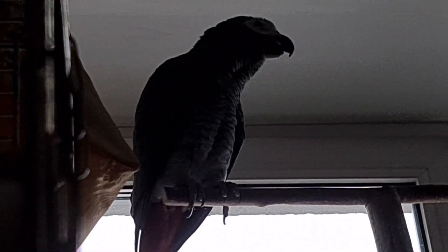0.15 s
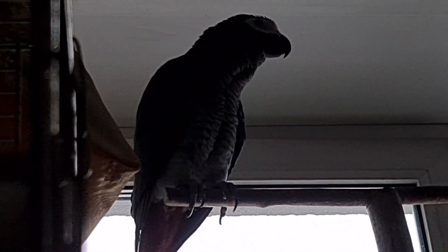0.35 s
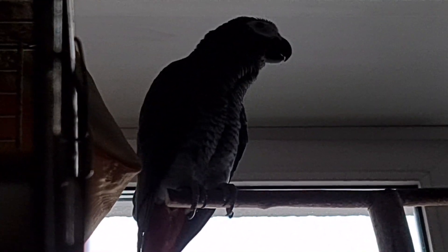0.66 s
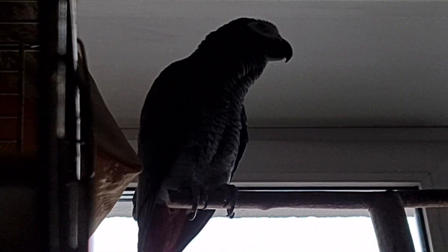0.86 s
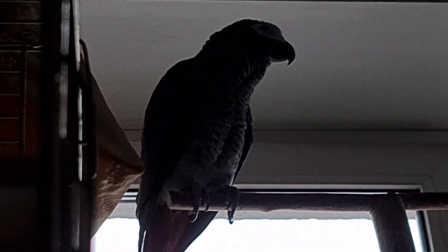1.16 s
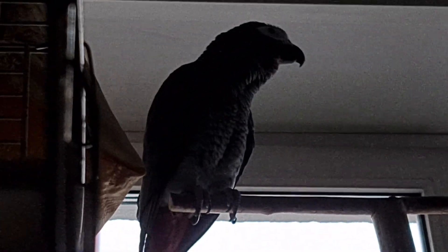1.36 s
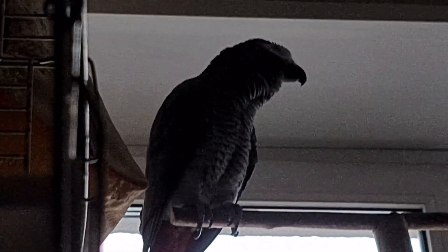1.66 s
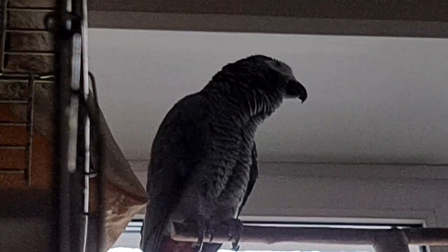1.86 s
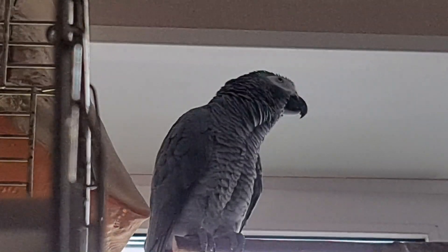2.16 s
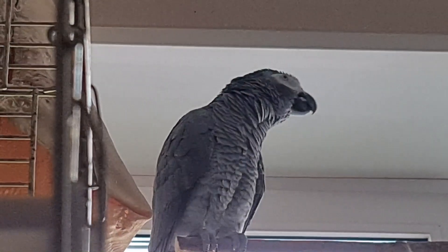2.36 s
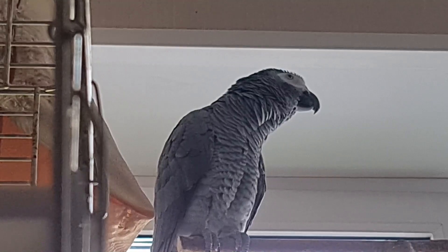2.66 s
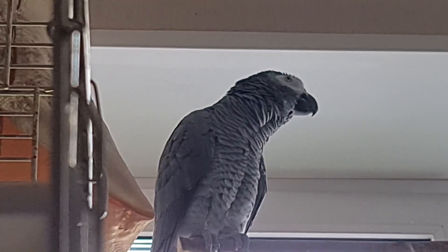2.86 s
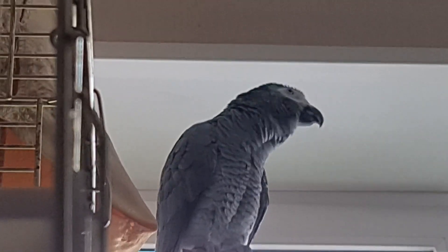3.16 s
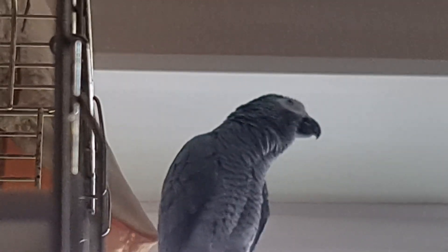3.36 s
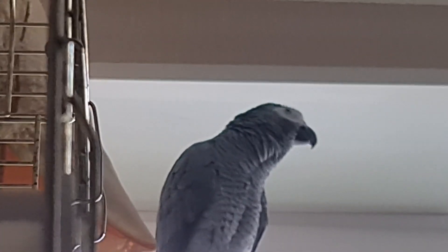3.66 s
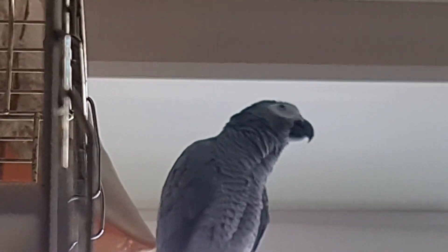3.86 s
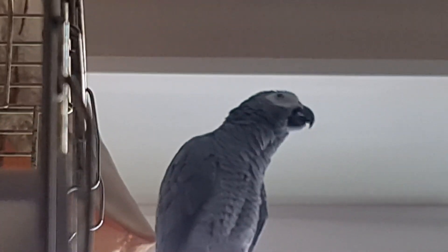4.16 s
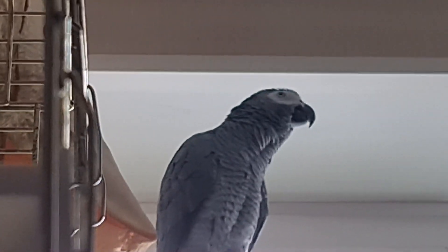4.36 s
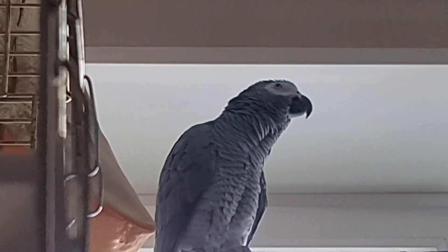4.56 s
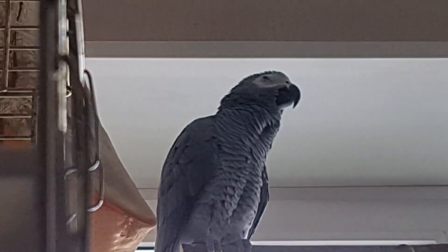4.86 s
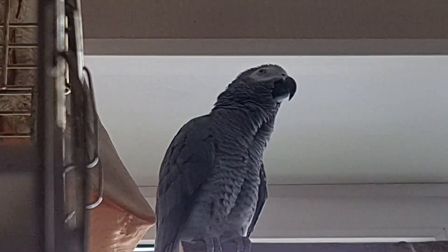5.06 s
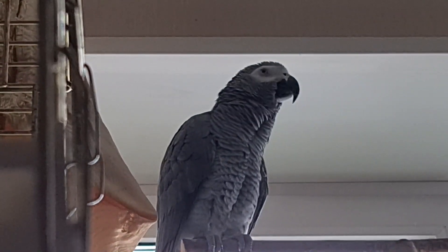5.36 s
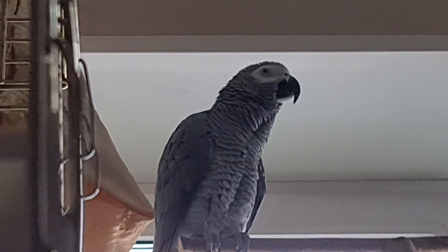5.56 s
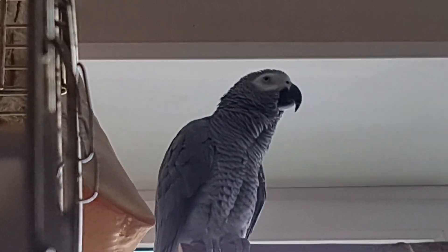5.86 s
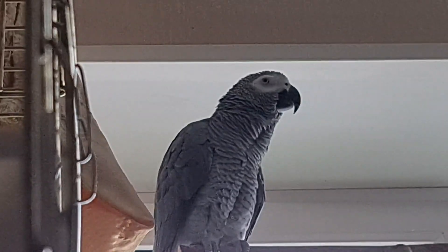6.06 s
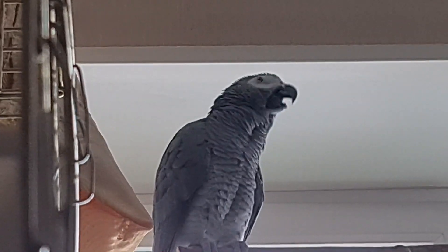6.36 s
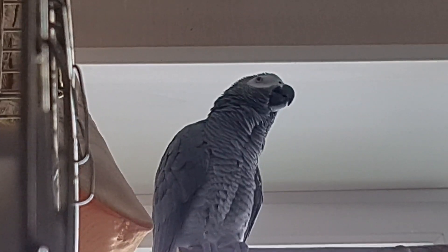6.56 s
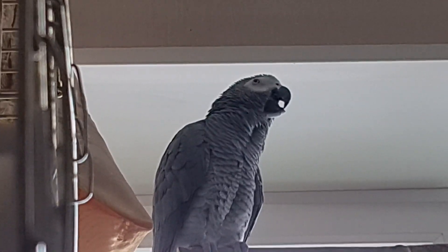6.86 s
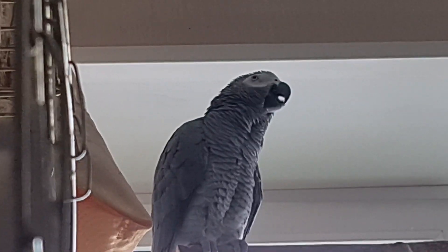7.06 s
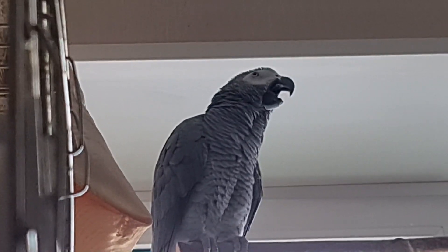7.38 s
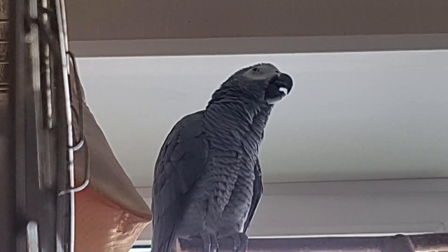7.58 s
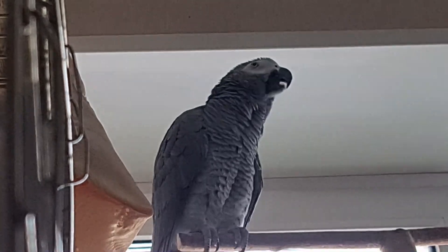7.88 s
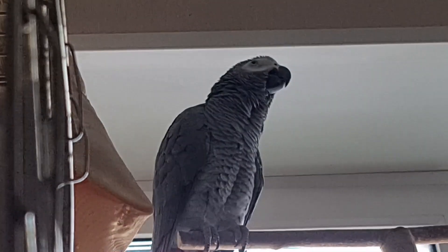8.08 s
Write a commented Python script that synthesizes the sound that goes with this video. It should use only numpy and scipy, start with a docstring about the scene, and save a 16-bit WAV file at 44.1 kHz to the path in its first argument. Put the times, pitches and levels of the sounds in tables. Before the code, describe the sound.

In a small room, a faint motor whine creeps slightly upward over the first few seconds and then holds, its tones gently swelling amid low hums, rumble and soft hiss. From 0.2 to 0.8 s a parrot whistles a rapid string: two falling glides, a level note, then a loud up-and-down whistle and a small pop. From 1.25 to 1.9 s come lower, drooping glides, the first slightly raspy. At 2.4 s a short, shrill, piercing whistle bursts out. From 3.0 to 3.45 s a very high, raspy squeal tumbles quickly down into chirps and little pops. A gravelly croak follows at 4.0 s, a short nasal squawk at 4.95 s and a soft low hoot at 6.3 s. A bright pop sounds at 6.85 s, a lighter one at 7.0 s, then faint scratchy rasps and clicky chirps at 7.3-7.5 s and a sharper one at 7.8 s. Short room echoes follow each call.

```python
"""A parrot on a perch near the ceiling of a small room gives short whistled glides, pops, hoots and rasps:
near-sines with overtones and breath for the notes, slaps ringing throat resonances for the rasps.
A small motor whines up to speed as sines locked to its shaft, among hums of fixed pitch.
Shaped noise makes the room rumble and hiss. A phone with two spaced microphones turns its gain down
after loud calls."""
import sys
import numpy as np
from scipy import signal
from scipy.fft import rfft, irfft, next_fast_len
from scipy.io import wavfile
from scipy.ndimage import uniform_filter1d, minimum_filter1d, map_coordinates

SR = 44100
rng = np.random.default_rng(int(sys.argv[2]) if len(sys.argv) > 2 else 0)


def waveform_to_disk(signal):
    """Save audio, clipped to [-1, 1], as 16-bit WAV at the path in sys.argv[1]."""
    frames = np.transpose(np.atleast_2d(signal))
    scaled = np.clip(frames, -1, 1) * 32767
    samples = np.round(scaled).astype(np.int16)
    wavfile.write(sys.argv[1], SR, samples)


N = 362634
TOP_HZ = 15780  # band limit of the phone, and of the parrot's higher partials


def amp(db):
    """Decibels to linear amplitude."""
    return 10 ** (np.asarray(db) / 20)


def unit(x):
    """Scales a signal to an rms of one."""
    return x / np.sqrt(np.mean(x ** 2) + 1e-20)


def along(points, hz):
    """Reads a curve of (frequency [Hz], value) points on a log frequency axis."""
    f, v = np.transpose(points)
    return np.interp(np.log(hz + 1), np.log(f + 1), v)


def wobble(rate):
    """A smooth random curve, rate knots a second."""
    knots = rng.standard_normal(int(N * rate / SR) + 4)
    return map_coordinates(knots, [np.arange(N) * rate / SR])


def filtered(x, response):
    """Filters x by a complex response of frequency."""
    m = next_fast_len(x.shape[-1] + 8192)
    spectrum = rfft(x, m) * response(np.fft.rfftfreq(m, 1 / SR))
    return irfft(spectrum, m)[..., :x.shape[-1]]


def paired(noise, alike, spectrum):
    """Mixes two noises so that left and right are alike to the given degree at each frequency."""
    turn = lambda hz: np.arccos(np.clip(along(alike, hz), -1, 1)) / 2
    shares = lambda hz: amp(along(spectrum, hz)) * [np.cos(turn(hz)), np.sin(turn(hz))]
    mid, side = filtered(noise, shares)
    return np.array([mid + side, mid - side])


def unsteady_sine(phase, db, apart):
    """A sine of drifting level; the microphones hear it apart radians out of step."""
    level = amp(db + 1.5 * wobble(6))
    return np.sqrt(2) * level * np.sin(phase + np.array([[apart / 2], [-apart / 2]]))


def motor():
    """The shaft creeps up to full speed; its orders, multiples of the turning rate, follow it."""
    # orders that swell and fade: (time [s], 7th rms [dB], 16th rms [dB], 18th rms [dB])
    whine = [(.1, -60, -90, -55), (1.1, -55, -60, -61), (2.1, -50, -54.5, -66), (2.8, -54, -52, -73),
             (3.5, -54.5, -62, -55), (4.5, -45, -49, -62), (5.6, -51.5, -53.5, -63),
             (6.2, -49.5, -60.5, -61), (6.7, -46.5, -55, -61), (7.2, -45, -60, -60), (8.2, -51, -65, -56)]
    # orders of even level: (order, rms [dB])
    even_orders = [(9, -64), (10, -65), (11, -64), (19, -69), (21, -67.5), (22, -72), (23, -73),
                   (24, -66.5), (25, -72), (32, -74), (36, -59), (45, -71)]
    # low orders that settle with the speed: (order, rms at first [dB], rms at speed [dB])
    low_orders = [(3 / 8, -88, -55), (4 / 8, -82, -56.5), (2 / 3, -57, -60.5), (8 / 8, -78, -49.5),
                  (9 / 8, -44.5, -50)]
    t = np.arange(N) / SR
    shaft_hz = 258.85 - 7.2 * np.exp(-t / 1.35)
    turn = 2 * np.pi * np.cumsum(shaft_hz + 0.052 * wobble(2.5)) / SR
    s, *levels = np.transpose(whine)
    out = np.zeros((2, N))
    for k, db, apart in zip((7, 16, 18), levels, (1.0, 1.5, 1.5)):
        out += unsteady_sine(k * turn, np.interp(t, s, db), apart)
    for k, db in even_orders:
        out += unsteady_sine(int(k) * turn, db, 1.5)
    settle = np.exp(-t / 0.76)
    for k, first_db, db in low_orders:
        out += unsteady_sine(k * turn + 0.24 * wobble(27), db + (first_db - db) * settle, 0.28)
    return out


def hum():
    """Sines of fixed pitch whose phases wander, some more loosely than others."""
    # (frequency [Hz], rms [dB], phase unsteadiness [rad])
    hums = [(49, -63.5, .3), (99, -56, .1), (117, -56, 1), (357, -68, 0.47), (394.4, -58.5, 0.74),
            (450, -58, 0.26), (806, -56, 0.22)]
    t = np.arange(N) / SR
    return sum(unsteady_sine(2 * np.pi * hz * t + loose * wobble(11), db, 0.083) for hz, db, loose in hums)


def air():
    """Room noise: rumble shared by both microphones, hiss their own."""
    # colour of the noise: (frequency [Hz], relative level per hertz [dB])
    colour = [(15, -32), (25, -18), (107, -13.5), (184, -10.5), (275, -1.5), (341, -13), (808, -12),
              (1420, -19.5), (1810, -17), (2190, -22), (4300, -24), (7170, -31.5), (9640, -31.5),
              (14100, -40), (15700, -71)]
    # how alike left and right are: (frequency [Hz], likeness [0-1])
    likeness = [(25, .94), (90, .97), (180, .92), (330, .75), (640, .65), (1400, .2), (3100, 0)]
    level = amp(-42.5 + 0.33 * wobble(2.252))
    return level * unit(paired(rng.standard_normal((2, N)), likeness, colour))


def note(voice, attack, hold, release, corners_hz, db, change_db, flutter):
    """The syrinx sings a near-sine, gliding between the envelope's corners; breath puffs once a cycle."""
    # colour of the higher partials: (frequency [Hz], relative level [dB])
    partial_colour = [(300, 9), (2500, -15), (4500, -7.5), (7000, 12.5), (9500, -11), (12500, 9),
                      (16000, -18)]
    # breath colour: (frequency [Hz], relative level per hertz [dB])
    breath_colour = [(500, -6), (2000, 24), (3500, 22), (5000, 9), (5800, 12), (6400, 20), (7100, 17.5),
                     (8000, 22.5), (10000, 21.5), (12000, 21.5), (14000, 25.5), (15700, 11)]
    attack_db, release_db = 26, 16  # rise into the hold and fall after it
    breath_db, higher_db, *partials_db = voice
    s = np.cumsum(np.abs([0, attack, hold, release]))
    t = np.arange(0, s[-1], 1 / SR)

    pitch = uniform_filter1d(np.interp(t, s, corners_hz), size=90)
    # flutter also wavers the pitch
    pitch *= 1 + 0.044 * flutter * map_coordinates(rng.standard_normal(200), [t * 300])
    phase = 2 * np.pi * np.cumsum(pitch) / SR
    corners_db = [-attack_db, 0, change_db, change_db - release_db]
    level_db = uniform_filter1d(np.interp(t, s, corners_db), size=90)
    effort_db = level_db - level_db.max()

    # each overtone's level drifts at random
    drift = lambda: amp(2.2 * map_coordinates(rng.standard_normal(60), [t * 45]))
    overtones = np.zeros(len(t))
    for k, part_db in enumerate(partials_db, start=2):
        overtones += amp(part_db) * np.sin(k * phase) * drift()
    for k in range(2 + len(partials_db), 24):
        level = (k * pitch < TOP_HZ) * amp(higher_db + along(partial_colour, k * pitch) - 6.5)
        overtones += level * np.sin(k * phase + 2 * np.pi * rng.random()) * drift()
    sung = np.sin(phase) + overtones * amp(0.11 * effort_db)  # overtones grow with effort

    puffs = rng.standard_normal(len(t)) * (1 + 0.37 * np.cos(phase))
    breath = unit(filtered(puffs, lambda f: amp(along(breath_colour, f))))
    sung += amp(breath_db + 0.16 * effort_db) * breath
    # random flutter in level, as if early reflections beat with the note
    shake = map_coordinates(rng.standard_normal(200), [t * 220])
    sung *= 1 + flutter * shake
    edge = np.clip(np.minimum(t, s[-1] - t) / .003, 0, 1) ** 2
    return sung * edge * amp(db + level_db)


def add_in_room(out, call, s, pan_db):
    """Places a call at both microphones with its own answer from ceiling and walls, at a set loudness."""
    # decay of the walls: (frequency [Hz], time to fall 60 dB [s])
    walls = [(300, 0.14), (700, 0.34), (1300, 0.32), (2100, 0.29), (3500, 0.26), (7000, 0.31),
             (12000, 0.096)]
    # how alike the echo is left and right: (frequency [Hz], likeness [0-1])
    echo_likeness = [(200, .95), (500, .6), (1000, .1), (2000, 0)]
    # the phone turns towards the bird: (time [s], lead of the left port [samples])
    left_lead = [(0, 8), (3.5, 7), (6.5, 2)]
    noise = paired(rng.standard_normal((2, SR // 2)), echo_likeness, [(1, 0)])
    hz, t, z = signal.stft(noise, SR, nperseg=256)
    decay = amp(-60 * t / along(walls, hz)[:, None])
    late = signal.istft(z * decay, SR, nperseg=256)[1]
    early = late * amp(-60 * np.arange(late.shape[1]) / SR / .06)
    tail = amp(-5) * late / np.linalg.norm(late[0]) + amp(-7) * early / np.linalg.norm(early[0])
    path = np.pad(tail, ((0, 0), (130, 0)))  # the echo waits 130 samples
    lead = round(np.interp(s, *np.transpose(left_lead)))
    path[0, 0] = path[1, lead] = 1  # direct sound
    heard = signal.fftconvolve(call[None], path, axes=1)
    loudness = 1.77 * np.linalg.norm(call) * amp([[pan_db / 2], [-pan_db / 2]])
    heard *= loudness / np.linalg.norm(heard, axis=1, keepdims=True)
    i = round(s * SR)
    out[:, i:i + heard.shape[1]] += heard[:, :N - i]


def rasp(length, rate, air_share, modes):
    """Uneven slaps of the syrinx, with air between them, ring the throat."""
    n = round(length * SR)
    slaps = np.zeros(n + 2000)  # room for the ring to die away
    gaps, sizes = rng.uniform(.5, 1.5, 200), amp(rng.normal(0, 3, 200))
    at = ((np.cumsum(gaps) - gaps[0]) * SR / rate).astype(int)
    slaps[at[at < n]] = sizes[at < n]
    slaps[:n] += air_share * rng.standard_normal(n)
    slaps[:n] *= np.sin(np.pi * np.linspace(.15, .95, n) ** 0.71)

    def throat(f):
        """Parallel resonances of alternating sign."""
        return sum((-1) ** k * amp(db) * 1j * f * width / (centre * centre - f * f + 1j * f * width)
                   for k, (centre, width, db) in enumerate(modes))

    x = filtered(slaps, lambda f: throat(f) / (1 + 1j * f / 13000) ** 2)  # soft tissue dulls the top
    return x / np.sqrt(np.sum(x ** 2) / n)


def parrot():
    """Every note and rasp of the syrinx, heard in the room by the two ports."""
    # (start [s], attack [s], hold [s], release [s], start pitch [Hz], hold start [Hz], hold end [Hz], # end
    # pitch [Hz], relative level at the start of the hold [dB], change over the hold [dB], # brightness [dB],
    # flutter [0-1], left-right [dB], voice) # the row at 1.57 s is the second partial of the next glide,
    # swelling as it begins
    notes = [ (0.227, 0.018, 0.022, 0.0086, 1500, 1300, 924, 743, -13, -0.5, 1, 0.11, 2.5, "glide"),
             (0.369, .04, .028, .012, 1120, 1204, 913, 680, -5, 0.5, -3, 0.35, 0, "glide"),
             (0.513, 0.026, 0.057, 0.0043, 1410, 1408, 1370, 1370, -2.5, -1, -0.5, 0.22, 3, "whistle"),
             (0.611, .012, 0.024, 0.008, 1353, 1360, 1356, 1300, -12.5, 0, -7, 0.58, 1, "whistle"),
             (0.639, .024, .034, 0.039, 1558, 1946, 1600, 1258, 2.5, -3.5, -1.5, 0.42, 0, "thin"),
             (0.789, 0.0119, 0.012, 0.01, 1920, 1893, 1764, 1660, -13, -4, 1, 0.3, 7.5, "pop"),
             (1.256, .04, .028, .05, 1280, 1011, 949, 560, -9, 2.5, 1.5, .15, 3.5, "glide"),
             (1.51, 0.027, 0.056, 0.01, 1019, 997, 957, 930, -17, 4.5, -1, .05, 10, "thin"),
             (1.57, .016, 0.036, 0.026, 1910, 1845, 1810, 1830, -23, -7.5, 6, 0, 8, "pop"),
             (1.595, .036, .038, 0.022, 929, 913, 711, 585, -3.5, -11.5, 0, 0, 1.5, "glide"),
             (1.803, .027, .036, 0.024, 740, 619, 469, 344, -34, 18.5, 1, 0, 3.5, "glide"),
             (2.406, 0.0055, 0.0054, 0.0059, 1676, 1708, 1750, 1670, -1, -15, -1, 0, 1.1, "shrill"),
             (2.419, 0.005, 0.0565, 0.014, 2060, 2090, 2075, 2010, -0.5, -3.3, -1, 0.13, -2.2, "shrill"),
             (3.006, 0.01, 0.031, 0.015, 3630, 3102, 3046, 3350, -7, -3, -3, 0.2, 7.5, "thin"),
             (3.05, 0.0072, 0.014, 0.0025, 4970, 4880, 4820, 4600, -23.5, 9.5, -6, 0.47, 8, "thin"),
             (3.064, .006, .009, 0.015, 4400, 4080, 3820, 3480, -9.5, -3, -1, 0.25, 5, "thin"),
             (3.086, 0.0035, 0.0034, 0.0064, 2560, 2650, 2590, 2490, 1, -5, 0, 0.27, 8, "thin"),
             (3.098, .005, 0.0194, 0.0058, 1920, 1820, 1392, 1420, -3, -2, 4.5, 0.54, -1, "thin"),
             (3.126, 0.0066, 0.032, .03, 1420, 1430, 1450, 1380, -2, -9.5, 0.5, 0.4, -1, "thin"),
             (3.17, 0.0046, .074, 0.0091, 1120, 999, 780, 780, -24, 1, 0.5, 0.65, 0, "glide"),
             (3.26, .006, 0.017, 0.013, 570, 590, 544, 490, -31, -4, 0, 0.24, 9, "glide"),
             (3.299, .011, 0.0031, 0.007, 840, 1050, 1077, 1080, -8, -1.5, 2, 0.5, 3, "pop"),
             (3.316, 0.0039, 0.0066, 0.0021, 1118, 1200, 1350, 1320, -24.5, 4, 6, 0.6, -12.5, "pop"),
             (3.423, 0.0033, 0.027, 0.0035, 900, 928, 1351, 1350, -19.5, -0.5, 5.5, 0.62, 0, "pop"),
             (4.94, 0.0308, 0.0742, 0.0076, 691, 652, 668.8, 670, -16, -2, 1.5, 0.14, 3, "squawk"),
             (6.32, 0.0304, 0.1, 0.021, 338, 368, 367, 350, -29.5, -3.5, -0.5, 0.13, -1.1, "hoot"),
             (6.837, 0.0047, 0.007, 0.01, 1692, 1703, 1670, 1650, -0.5, -10, -0.5, .05, 0, "pop"),
             (6.981, .003, 0.0042, .005, 2310, 2095, 1680, 1830, -10.5, 4, -5, 0.1, 3.5, "pop"),
             (7.461, 0.0068, .002, 0.0033, 1720, 1630, 1640, 1597, -22, -4, -1, 0.32, 2.2, "chirp"),
             (7.807, 0.0069, 0.0028, .003, 1546, 1660, 1825, 1810, -18.5, -5.5, 2.5, .3, 5, "chirp"), ]
    # (start [s], length [s], mean slap rate [1/s], air share, rms setting the loudness heard with
    # the echo [dB], left-right [dB], throat resonances (frequency [Hz], width [Hz], relative level [dB]))
    rasps = [ (1.262, 0.043, 424, 0.48, -34, 2, [(1730, 280, -5.5), (2290, 900, -11.5),
             (3400, 510, -16.5)]), (2.408, 0.03, 291, 0.047, -13, 1, [(840, 370, -12), (1915, 195, 9),
             (2316, 102, 12), (4560, 620, -3), (7040, 3900, -18.5), (11000, 4200, -24)]),
             (2.993, 0.037, 501, 0.39, -28, 3, [(3570, 280, -16), (5800, 140, -10), (11900, 1200, -37.5)]),
             (3.035, 0.079, 504, .3, -20, 2, [(3340, 140, 22.5), (4160, 1350, 9), (5160, 540, 5),
             (6140, 310, -25.5), (13700, 2100, -9)]), (4.015, 0.011, 185, 0.13, -26, 1, [(1720, 300, 6),
             (3270, 1000, -4.5), (5000, 1200, -11)]), (4.027, 0.1, 121.1, 0.047, -24.5, 2.6, [(200, 25, -9),
             (447, 63, -7), (712, 19, 3.5), (978, 48, 7), (1790, 500, 2), (3700, 1120, -7),
             (6140, 370, -15), (8200, 1800, -22.5), (11400, 2300, -19.5)]),
             (7.299, 0.036, 430, 0.083, -42, 1.1, [(1610, 560, -1.5), (2280, 490, -1), (3100, 480, -7)]),
             (7.428, 0.068, 940, .3, -49, 1, [(4300, 2000, 21), (9500, 4500, -4)]),
             (7.455, 0.078, 497, 0.24, -41, 2.2, [(1660, 440, 2), (3430, 490, 3), (5570, 1500, -16.5)]),
             (7.48, 0.016, 350.7, 0.11, -26, 2.5, [(1000, 62, 5.5), (1700, 190, 8.5), (2900, 1100, 4),
             (3560, 380, 9), (5600, 860, -30.5), (12200, 3600, -42)]),
             (7.83, 0.028, 277.4, 0.11, -16, 1, [(1060, 62, -7), (1600, 300, -4.5), (2100, 370, 4.5),
             (2840, 390, 1), (3670, 290, -9.5), (5430, 1100, -46), (9050, 2500, -30.5),
             (12100, 1200, -24.5)]), ]
    # name: (breath [dB], higher partials [dB], 2nd partial [dB], 3rd partial [dB], and so on)
    voices = { "glide": (-30.5, -38.5, -17, -29), "whistle": (-38.5, -40, -16.5, -40.5, -69, -38),
              "shrill": (-36.5, -38.5, -19, -26, -52, -26.5), "thin": (-34, -48, -33, -51),
              "pop": (-42.5, -61, -55, -65), "hoot": (-54, -52, -3, -5),
              "squawk": (-26, -28, -9, -9.5, -22.5, -14.5, -28, -35), "chirp": (-23.5, -44, -3.5, -30), }
    # the phone's body shades each port: (frequency [Hz], left-right [dB])
    lean = [(2500, 0), (4500, 2), (8000, -4), (15000, -5)]
    out = np.zeros((2, N))
    for s, attack, hold, release, *corners_hz, db, change_db, bright_db, flutter, pan_db, voice in notes:
        timbre = np.add(voices[voice], bright_db)
        call = note(timbre, attack, hold, release, corners_hz, db, change_db, flutter)
        add_in_room(out, call, s, pan_db)
    for s, length, rate, air_share, db, pan_db, modes in rasps:
        add_in_room(out, amp(db) * rasp(length, rate, air_share, modes), s, pan_db)
    return filtered(out, lambda hz: amp(along(lean, hz) * [[.5], [-.5]]))


def scene():
    """Parrot, motor, hums and room air together."""
    return parrot() + motor() + hum() + air()


def record(dry):
    """Gain control backs off with recent loudness; a limiter holds the peaks; a band limit cuts the top."""
    keep = np.exp(-1 / (1.5 * SR))  # loudness memory of 1.5 s
    loud = signal.lfilter([1 - keep], [1, -keep], np.mean(dry ** 2, axis=0))
    x = dry * (1 + loud / amp(-21.5) ** 2) ** -.25
    needed = np.minimum(1, .99 / (np.abs(x).max(axis=0) + 1e-9))
    x = x * uniform_filter1d(minimum_filter1d(needed, size=265), size=131)
    return filtered(x, lambda hz: hz < TOP_HZ)


dry = scene()
out = record(dry)
waveform_to_disk(out)
```